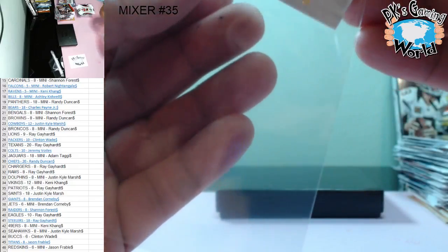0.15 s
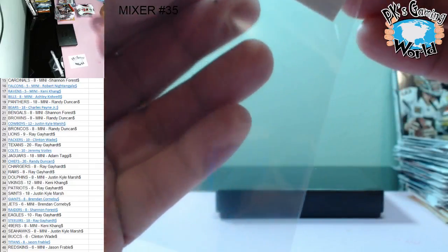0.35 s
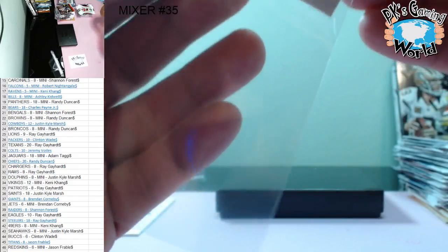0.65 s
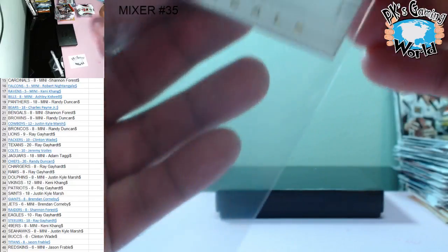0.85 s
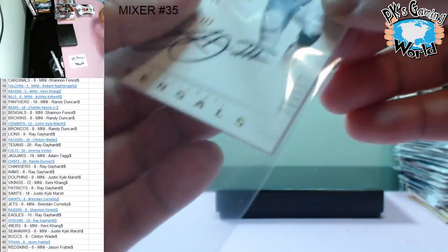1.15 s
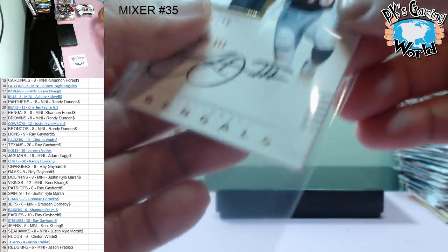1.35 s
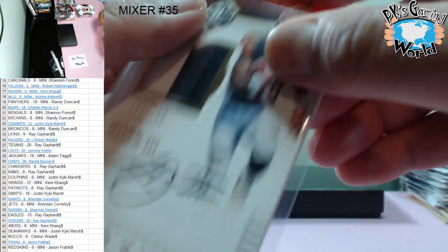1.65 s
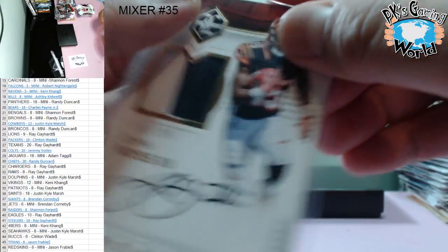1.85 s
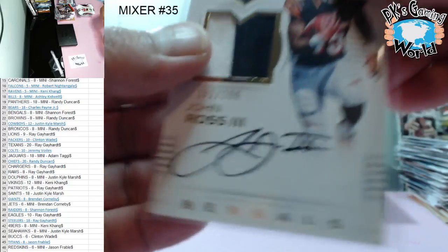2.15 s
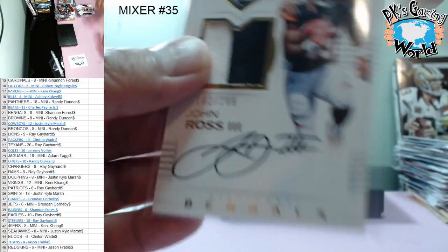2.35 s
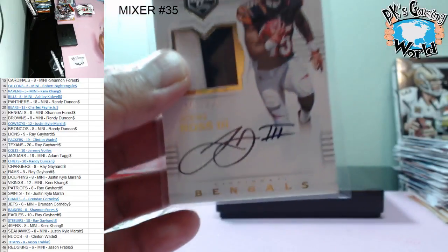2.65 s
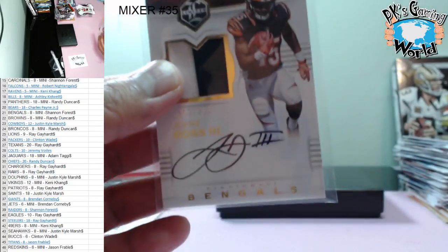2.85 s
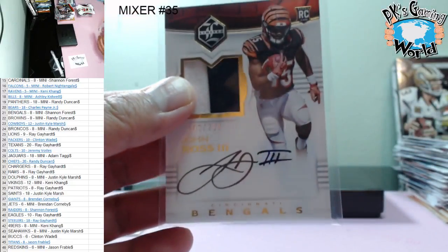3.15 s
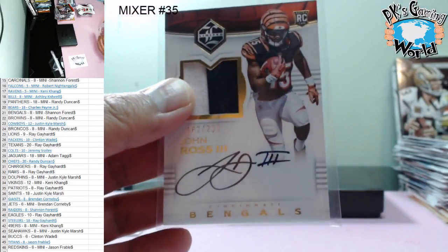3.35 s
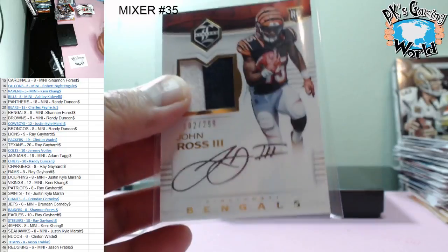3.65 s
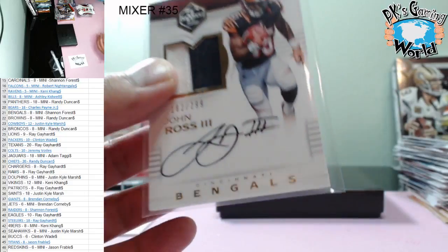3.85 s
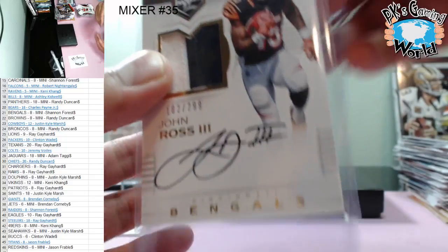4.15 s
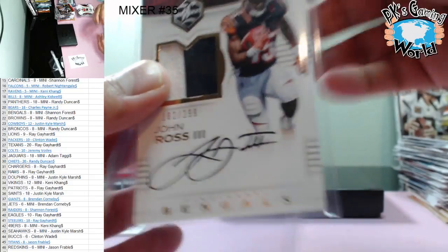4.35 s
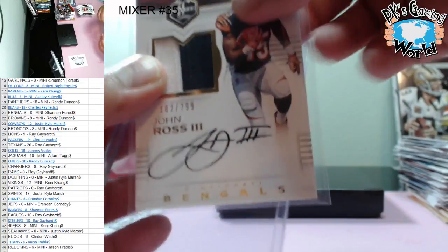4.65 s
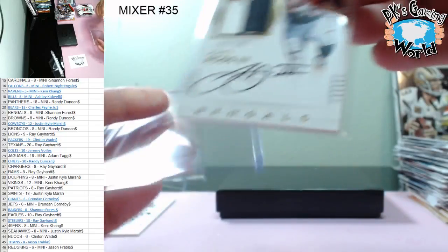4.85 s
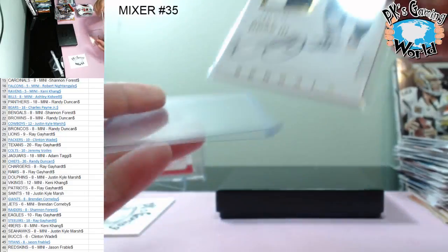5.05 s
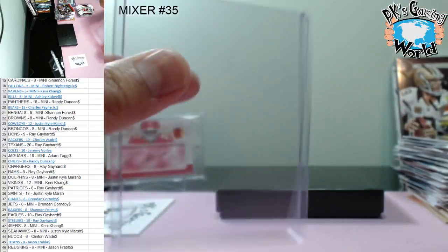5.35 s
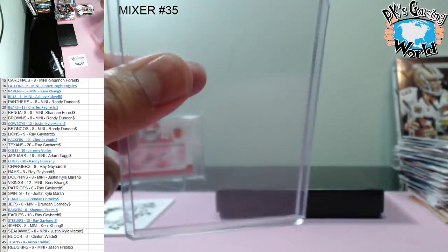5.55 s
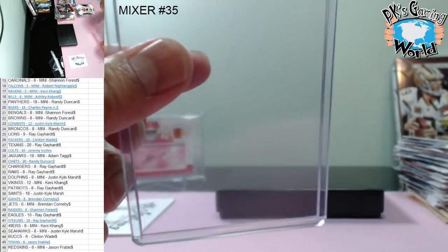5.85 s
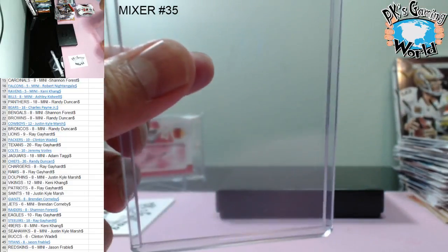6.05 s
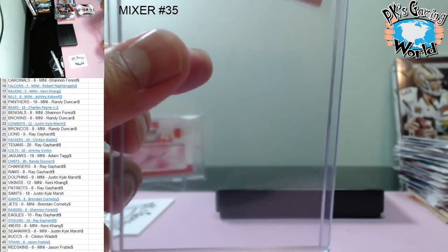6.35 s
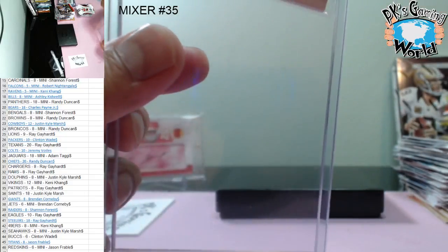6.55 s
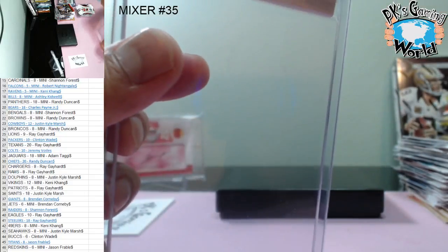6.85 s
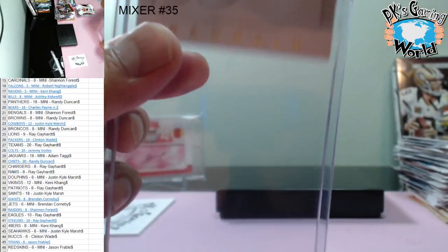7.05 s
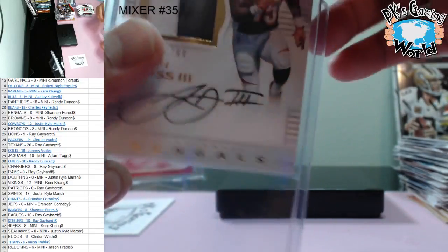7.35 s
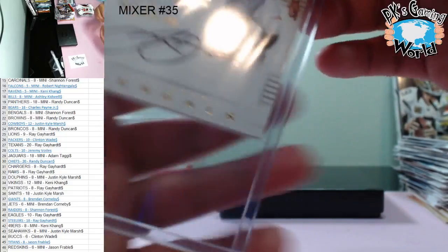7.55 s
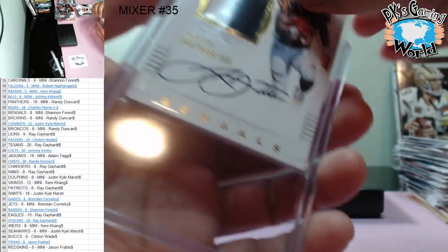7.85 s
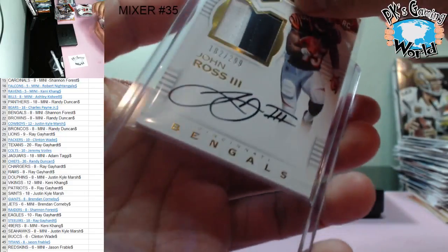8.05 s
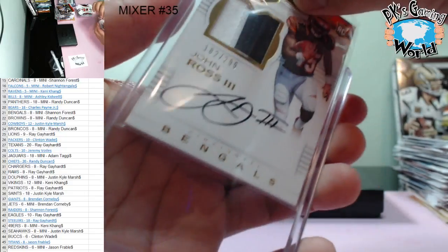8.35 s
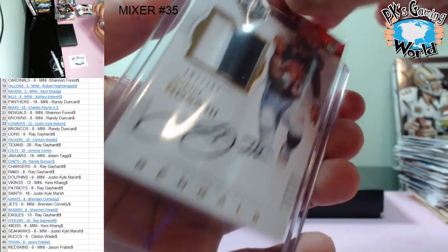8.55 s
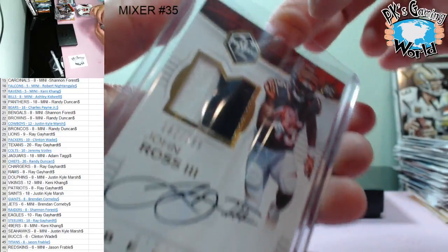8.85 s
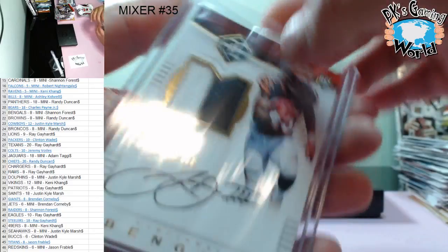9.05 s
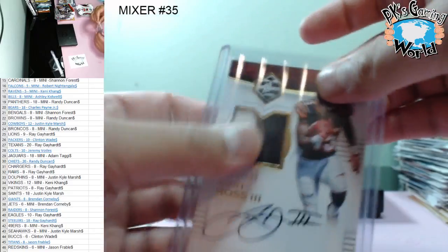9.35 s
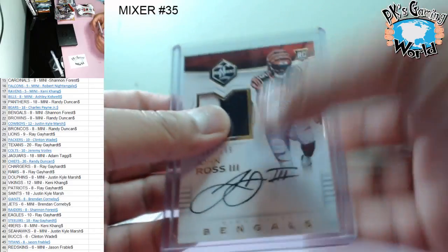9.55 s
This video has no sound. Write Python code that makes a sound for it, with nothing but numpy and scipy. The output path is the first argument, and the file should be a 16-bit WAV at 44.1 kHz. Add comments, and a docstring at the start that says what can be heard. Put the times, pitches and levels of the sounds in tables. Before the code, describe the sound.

A quiet, close recording in a small furnished room, with a steady soft fan murmur, low electrical buzz and faint distant drone throughout. From 0 to 1.5 s, thin plastic slides in faint airy hisses with scattered tiny ticks. Crisp clicks follow at 1.7 and 2.2 s, the latter sharpest. A dull desk thump at 2.7 s leads into a low hollow scrape around 3.1 s, ending in a knock. From 3.6 to 5 s the sleeve rubs, crackles faintly and squeaks briefly, with woodier clicks and a strong tap at 4.9 s. A soft low thud lands near 5.3 s; then it is almost still, the drone slightly clearer, until about 6.2 s. Fuller hissing slides rise at 6.9-7.1 and 7.6 s, with a bright snap at 7.8 s. A busy cluster of crackles and ticks comes at 8.3-8.7 s, then sparse light clicks and faint rubbing to about 9.7 s.

```python
"""Sleeving a trading card

A card is slipped into a soft sleeve, then into a rigid plastic holder, close to a small camera.
Shaped noise makes the plastic slide and hiss; short noise bursts through resonances make edges tick.
Things are knocked and pushed on the desk (ringing modes, hollow grainy noise); the sleeve crackles and squeaks.
Under it lie a low electrical buzz (pulses), a distant drone (a sine) and the murmur of a fan (noise)."""
import sys
import numpy as np
from scipy import signal
from scipy.fft import rfft, irfft
from scipy.io import wavfile

SR = 44100
rng = np.random.default_rng(int(sys.argv[2]) if len(sys.argv) > 2 else 0)


def wav_out(sig):
    """Save sig, one row per channel (or a flat mono array), as 16-bit PCM at SR to the path in sys.argv[1]."""
    wavfile.write(sys.argv[1], SR, np.round(np.clip(np.atleast_2d(sig).T, -1, 1) * 32767).astype(np.int16))


N = 427329


def amp(db):
    """Turns decibels into gain."""
    return 10 ** (np.asarray(db) / 20)


def evened(x):
    """Scales a sound to an average (rms) of 1."""
    return x / np.sqrt(np.mean(x ** 2) + 1e-20)


def read(points, hz):
    """Reads a spectrum between its points, on a log-frequency axis."""
    f, value = np.transpose(points)
    return np.interp(np.log(hz + 1), np.log(f + 1), value)


def curves(rows):
    """Joins the rows of a timed table by straight lines, one curve per column."""
    s, *columns = np.transpose(rows)
    times = np.arange(N) / SR
    return [np.interp(times, s, column) for column in columns]


def add(mix, s, sound):
    """Mixes a sound in at time s, cutting it off at the end."""
    part = mix[round(s * SR):][:len(sound)]
    part += sound[:len(part)]


def drift(rate_hz):
    """Slow random wandering of rms 1: noise with everything much faster than rate_hz removed."""
    hz = np.fft.rfftfreq(N, 1 / SR)
    spectrum = rfft(rng.standard_normal(N)) * np.exp(-(hz / rate_hz) ** 2)
    return evened(irfft(spectrum, N))


def response(points, peaks=(), size=2048):
    """What a struck body answers: a broad spectrum plus resonant peaks, starting at once, with energy 1."""
    hz = abs(np.fft.fftfreq(size, 1 / SR))
    db = read(points, hz)
    for f, width, gain_db in peaks:
        db = db + gain_db / (1 + (2 * (hz - f) / width) ** 2)
    # minimum phase: the sound comes as early as this spectrum allows
    h = np.fft.ifft(np.exp(np.conj(signal.hilbert(np.log(amp(db)))))).real
    return h / np.linalg.norm(h)


def through(x, h):
    """Passes x through an impulse response."""
    return signal.oaconvolve(x, h)[:len(x)]


def grains(per_s, spread_db, smooth):
    """Tiny stick-slip releases of uneven size over smooth friction noise."""
    size = amp(spread_db * np.minimum(rng.exponential(1, N), 4))
    happens = rng.random(N) < per_s / SR
    slips = rng.choice([-1., 1.], N) * size * happens
    return evened(evened(slips) + smooth * rng.standard_normal(N))


def resonate(x, hz, width):
    """A resonance of gain 1 that follows the curve hz: shift down, smooth, shift back up."""
    turn = np.exp(2j * np.pi * np.cumsum(hz) / SR)
    r = np.exp(-np.pi * width / SR)
    return 2 * (turn * signal.lfilter([1 - r], [1, -r], x / turn)).real


def nearby(x, echo_db=-13, latest_s=.005, count=6):
    """Hands and desk throw back a few early reflections that ripple the spectrum."""
    taps = np.zeros(SR // 50)
    at = np.linspace(.15, 1, count) * rng.uniform(.85, 1, count) * latest_s
    fading = np.linspace(1, .5, count)
    taps[(at * SR).astype(int)] = amp(echo_db) * rng.choice([-1., 1.], count) * fading
    taps[0] = 1  # the direct sound
    return through(x, taps / np.linalg.norm(taps))


REST_DB = -79.5  # level of a hand at rest, from which every stroke swells


def stroke(rise_s, hold_s, release_s, db):
    """One hand movement, top 1: it swells evenly in decibels from rest, holds, and dies away."""
    knees = np.cumsum([rise_s, hold_s, release_s])
    t = np.arange(0, knees[-1], 1 / SR)
    depth_db = min(REST_DB - db, 0)
    return amp(np.interp(t, [0, *knees], [depth_db, 0, 0, depth_db]))


# spectrum of the fan's air noise: f/Hz, relative level/dB
FAN_SPECTRUM = [(10, -15), (25, -2), (55, -1), (100, -7.5), (160, -9.5), (250, -14.5), (450, -16.5),
                (760, -20.5), (1200, -26), (2000, -29.5), (4000, -33.5), (8000, -36.5), (12000, -38.5),
                (16000, -40.5)]
# how much the room's low rumble is raised or lowered: t/s, level/dB
RUMBLE_LEVEL = [(6.3, -2.5), (6.7, 2), (7.3, -1), (8.8, 0.5), (9.3, 1.5)]
# steady tones of fan and electronics: f/Hz, level/dB (rms)
STEADY_TONES = [(58.7, -69), (780.2, -77), (958, -83), (8000, -88)]
# a distant low drone that swells for a while: t/s, f/Hz, level/dB (rms)
DISTANT_DRONE = [(0, 126, -65), (1.3, 126, -63.5), (2.2, 128, -64.5), (3.4, 124.4, -64), (4.85, 125.5, -65),
                 (4.98, 122, -56), (5.9, 122.3, -60), (6.28, 121, -56), (6.4, 122.3, -69.5),
                 (9.7, 123, -81)]


def background(floor_db=-59.5, swell_db=0.46, waver_rad=1.0, rumble_hz=400):
    """Fan noise with a slowly changing rumble, faint tones of wavering phase and a low drone."""
    t, hz = np.arange(N) / SR, np.fft.rfftfreq(N, 1 / SR)
    air = evened(through(rng.standard_normal(N), response(FAN_SPECTRUM, size=8192)))
    air = air * amp(floor_db + swell_db * drift(9.1))
    rumble = irfft(rfft(air) * np.exp(-(hz / rumble_hz) ** 2), N)
    air = air + (amp(curves(RUMBLE_LEVEL)[0]) - 1) * rumble
    tones = sum(amp(db) * np.sin(2 * np.pi * f * t + waver_rad * drift(1.5)) for f, db in STEADY_TONES)
    drone_hz, drone_db = curves(DISTANT_DRONE)
    drone_turns = np.cumsum(drone_hz) / SR + rng.random()
    drone = amp(drone_db) * np.sin(2 * np.pi * drone_turns)
    return air + np.sqrt(2) * (tones + drone)  # a sine's peak is root 2 times its rms


# spectrum of one electrical pulse: f/Hz, relative level/dB
PULSE_SPECTRUM = [(5, -30), (30, -8), (60, 0), (150, -3.5), (300, -8), (720, -17), (1200, -31), (3000, -80)]


def buzz(level_db=-60, pulses_hz=30.01, first_s=.0182):
    """The camera's electronics leak one small rounded pulse for every picture."""
    pulses = np.zeros(N)
    times = np.arange(first_s, N / SR, 1 / pulses_hz)
    pulses[(times * SR).astype(int)] = -1
    return amp(level_db) * evened(through(pulses, response(PULSE_SPECTRUM, size=8192)))


# edges catching and tapping: t/s, level/dB, brightness/dB, contact/ms, main ring f/Hz
EDGE_CLICKS = [(0.0662, -47.5, 4, 0.76, 7100), (0.2476, -60, 0, 7.4, 2000), (0.2828, -61, 1, 4.6, 2280),
               (1.015, -57, 4, 4.2, 9750), (1.355, -53, -6, 1.2, 2450), (1.6661, -43.5, 11.5, 0.34, 7800),
               (1.722, -55.5, 8, 2, 8800), (1.8308, -59.5, -1.5, 2.1, 2800), (2.0511, -45, 1, 0.55, 7750),
               (2.232, -38.5, 6, 0.3, 5500), (2.2455, -49, 10, 0.92, 5500), (2.2777, -49, 6, 2.6, 8400),
               (3.6504, -40.5, 1, 4.3, 5600), (3.716, -55, -16, 3.8, 2600), (3.77, -53.5, -6, 4.6, 3250),
               (4.2627, -54.5, -8.5, 2.9, 2830), (4.3505, -50, -8.5, 5.2, 3500),
               (4.5284, -56.5, -7, 8.7, 2270), (4.6851, -47.5, -1, 1.9, 2300),
               (4.7077, -43.5, -10.5, 4, 2280), (4.8276, -57, -4, 2.8, 3700), (4.8418, -56, -19, 2.2, 2750),
               (4.9055, -38, -3.5, 2.3, 3500), (5.2893, -47, -17, 4.7, 2620),
               (5.4395, -50.5, -7, 3.1, 2350), (5.977, -64, 0, 2.5, 2700), (6.158, -55, -2, 0.77, 2850),
               (7.0511, -46.5, -1, 1.5, 3700), (7.6426, -59.5, 15, 2, 8600), (7.708, -53, 24, 1.6, 7800),
               (7.8131, -40, 14, 3.1, 8040), (8.3235, -48.5, 2.5, 2.3, 6600), (8.355, -44.5, 16, 1.3, 6560),
               (8.373, -46.5, -6, 2, 2280), (8.4216, -47.5, 4, 2.5, 2170), (8.457, -42.5, 6.5, 1.1, 8350),
               (8.5517, -49, -2.5, 1.4, 2260), (8.593, -51.5, -4, 1.6, 2000), (8.6704, -56, -2.5, 5, 2160),
               (8.8826, -50, -2.5, 3, 2060), (9.0423, -50, 1, 3.8, 7600), (9.159, -60, -2, 3.2, 2820),
               (9.236, -60, -7, 3, 2470), (9.355, -51, 2.5, 2.7, 5800), (9.599, -49.5, 6, 4.4, 5330)]
# resonances of card and holder: f/Hz, width/Hz, level/dB
PLASTIC_PEAKS = [(2290, 350, 4), (2705, 180, 2.5), (3480, 110, 2.5), (4030, 200, 1.5), (5380, 500, -3),
                 (6860, 830, 3.5), (8000, 490, 2.5), (9440, 600, 2)]
# spectrum of the dull, hollow part of a blow: f/Hz, relative level/dB
BODY_SPECTRUM = [(100, -28), (300, -2), (750, 2.5), (1300, -4), (1700, -16.5), (3000, -50)]
# spectrum of bending plastic: f/Hz, relative level/dB
FLEX_SPECTRUM = [(700, -33), (1400, -9), (1900, -1.5), (3000, 6), (4400, 0), (5500, -1.5), (8000, -43)]
# spectrum of the bright part of a snap: f/Hz, relative level/dB
SNAP_SPECTRUM = [(2500, -40), (3700, -10.5), (5400, 5), (8000, 4.5), (10300, 3.5), (12000, -5),
                 (16000, -30)]
# the main bending resonance shifts and sharpens with the grip: t/s, f/Hz, strength level/dB
GRIP_CURVE = [(0, 2380, -4), (1.4, 2450, -8), (3.8, 2570, -24), (4.1, 2310, -5), (4.8, 2400, -1),
              (6.2, 2580, 0), (7.3, 2650, -3), (7.8, 2350, 0), (8.3, 2060, -1), (8.7, 2150, 4),
              (9.3, 2300, -8)]


def clicks(body_at_1ms_db=-22, body_db_per_doubling=6.0, first_snap=4.7, chatter_db=-21, chatter_s=0.0028,
           ring_db=9, ring_width_share=0.18, loose_hz=2500, rise_share=0.28, soften=0.23, body_per_bright=0.28):
    """An edge snaps free and chatters briefly, ringing one resonance most; longer contact sounds more hollow."""
    out, t = np.zeros(N), np.arange(4096) / SR
    body, grip_hz = response(BODY_SPECTRUM), curves(GRIP_CURVE)[0]
    window = SR // 100  # loudness is set over the first 10 ms
    for s, db, bright_db, contact_ms, ring_hz in EDGE_CLICKS:
        peaks = [*PLASTIC_PEAKS, (ring_hz, ring_width_share * ring_hz, ring_db)]
        # the whole bending range moves with the grip
        bending = np.array(FLEX_SPECTRUM) * [grip_hz[round(s * SR)] / loose_hz, 1]
        flex, snap = response(bending, peaks), response(SNAP_SPECTRUM, peaks)
        contact = np.exp(-t * 1000 / (np.sqrt(2) * contact_ms))
        chatter = amp(chatter_db) * np.exp(-t / chatter_s)
        force = rng.standard_normal(len(t)) * (contact + chatter)
        force *= 1 - np.exp(-t * 1000 / (rise_share * contact_ms))
        force[0] = first_snap / contact_ms ** soften  # a long contact starts softly
        parts = [through(force, h) for h in (body, flex, snap)]
        low, mid, high = (y / np.sqrt(np.mean(y[:window] ** 2)) for y in parts)
        tick = (mid + amp(bright_db) * high) / np.hypot(1, amp(bright_db))
        body_db = body_at_1ms_db + body_db_per_doubling * np.log2(contact_ms) - body_per_bright * bright_db
        add(out, s, amp(db) * (tick + amp(body_db) * low))
    return out


# plastic sliding on plastic: t/s, rise/s, hold/s, release/s, level/dB, brightness/dB
SLIDING_STROKES = [(0.33, 0.048, .01, 0.058, -64.5, 2), (0.559, 0.078, 0.044, 0.22, -66, 2.5),
                   (0.761, 0.028, 0.0042, 0.072, -62.5, 8), (0.926, 0.086, 0.025, 0.19, -57, 8.5),
                   (1.333, .03, 0.3, .13, -64, 8.5), (1.463, 0.096, .005, 0.073, -62, 13),
                   (2.211, 0.018, 0.057, 0.016, -60, 4), (3.605, 0.041, 0.17, 0.31, -60.5, -5),
                   (4.063, 0.028, 0.025, .04, -59, -3), (4.254, 0.043, 0.028, 0.17, -57.5, 0),
                   (4.47, 0.033, .01, .025, -56, 25), (4.516, .025, 0.017, 0.099, -64.5, 0),
                   (4.67, 0.012, .02, 0.071, -57, -4), (4.73, .04, .12, .03, -70.5, 0),
                   (4.894, .012, 0.024, 0.064, -57, -15), (4.975, 0.1, 0.1, .09, -66.5, -2.5),
                   (5.23, 0.05, 0.0089, 0.04, -53, -1), (6.179, 0.076, .01, 0.16, -58.5, 0.5),
                   (6.894, 0.11, 0.1, 0.21, -56, 5.5), (7.05, 0.097, 0.094, 0.1, -52, 10),
                   (7.527, 0.079, 0.044, .04, -71, 1), (7.615, .17, .03, 0.046, -53, 8),
                   (7.914, 0.053, 0.18, 0.085, -71.5, 2), (8.3, 0.064, 0.063, 0.058, -58, -1.5),
                   (8.431, .025, 0.19, 0.091, -59.5, 0), (8.971, 0.072, .005, 0.028, -57.5, -2),
                   (9.132, 0.026, 0.21, .05, -68.5, -2), (9.468, 0.067, 0.17, .05, -63, 0.5)]
# spectrum of the sliding hiss: f/Hz, relative level/dB
HISS_SPECTRUM = [(2500, -53), (4300, -6.5), (5400, 1.5), (8000, -0.5), (10500, 0.5), (12000, -6),
                 (13500, -14), (16000, -24)]


def sliding(flex_unsteady_db=2.5, hiss_unsteady_db=1.9, grip_db=4, stage_width_hz=400,
            hiss_power=1.1, tilt_per_bright=0.62, plain_bright_db=4, pivot_hz=9800, loose_hz=2350):
    """Friction rings the plastic's bending resonances; a bright stroke hisses more and higher."""
    grip_hz, strength_db = curves(GRIP_CURVE)
    friction, pressure = grains(per_s=1200, spread_db=2.8, smooth=0.98), drift(43)
    glide = grains(per_s=3500, spread_db=2.5, smooth=0.92)
    drag = evened(friction * amp(flex_unsteady_db * pressure))
    skim = evened(glide * amp(hiss_unsteady_db * pressure))
    # two stages make the bending resonance narrower and steeper
    ring = resonate(drag, grip_hz, stage_width_hz)
    ring = evened(resonate(ring, grip_hz, stage_width_hz))
    out = np.zeros(N)
    for s, rise_s, hold_s, release_s, db, bright_db in SLIDING_STROKES:
        start = round(s * SR)
        speed = stroke(rise_s, hold_s, release_s, db)[:N - start]
        span = slice(start, start + len(speed))
        # the whole bending range moves with the grip
        bending = np.array(FLEX_SPECTRUM) * [grip_hz[span].mean() / loose_hz, 1]
        share = amp(strength_db[span] - grip_db)
        flex = through(drag[span], response(bending, PLASTIC_PEAKS))
        flex = (flex + share * ring[span]) / np.hypot(1, share)
        tilt_db = tilt_per_bright * (bright_db - plain_bright_db)  # per octave, below the pivot
        colour = [(hz, g + tilt_db * min(np.log2(hz / pivot_hz), 0)) for hz, g in HISS_SPECTRUM]
        hiss = amp(bright_db) * through(skim[span], response(colour, PLASTIC_PEAKS))
        rub = (flex * speed + hiss * speed ** hiss_power) / np.hypot(1, amp(bright_db))
        add(out, s, amp(db) * nearby(rub, echo_db=-14))  # the hands lie differently for every stroke
    return out


# knocks on the desk: t/s, level/dB, centre of the blow f/Hz, contact/ms
DESK_KNOCKS = [(2.2317, -56.5, 1040, 1), (2.704, -46.5, 197, 7.9), (3.214, -51.5, 690, 1.6),
               (3.6505, -49, 1230, 3.2), (4.7074, -66, 1100, 3), (4.907, -64, 600, 3.5),
               (5.282, -44, 176, 13)]
# what the desk rings with: f/Hz, relative level/dB, time to fade by 60 dB/s
DESK_MODES = [(119.6, 6.5, 0.22), (171, -7, 0.2), (259.4, 3.5, 0.097), (546, -17, 0.14), (731, 7, 0.076),
              (815, 3, 0.1), (1114, -5.5, 0.11), (1270, 7, 0.1), (1332, -3.5, 0.17), (1850, -1.5, .09)]


def knocks(reach_octaves=0.56, thud_db=-9):
    """Each blow rings the desk modes near its own pitch, with a short dull thud."""
    out, t = np.zeros(N), np.arange(SR // 3) / SR
    window = SR // 40  # loudness is set over the first 25 ms
    for s, db, centre_hz, contact_ms in DESK_KNOCKS:
        ring = np.zeros(len(t))
        for hz, mode_db, t60 in DESK_MODES:
            nearness = 1 / (1 + (np.log2(hz / centre_hz) / reach_octaves) ** 2)
            wave = np.sin(2 * np.pi * (hz * t + rng.random()))
            ring += amp(mode_db - 60 * t / t60) * nearness * wave
        contact = np.exp(-t * 1000 / contact_ms)
        ring = ring * (1 - contact ** 4)  # the ring builds up during the contact
        thud = through(rng.standard_normal(len(t)) * np.sqrt(contact), response(BODY_SPECTRUM))
        blow = evened(ring) + amp(thud_db) * evened(thud)
        add(out, s, amp(db) * blow / np.sqrt(np.mean(blow[:window] ** 2)))
    return out


# something shifted and pushed over the desk: t/s, rise/s, hold/s, release/s, level/dB
DESK_PUSHES = [(2.68, 0.027, .005, 0.093, -55.5), (2.754, 0.16, 0.13, 0.087, -71),
               (3.136, .14, 0.13, 0.039, -55)]
# spectrum of the scrape: f/Hz, relative level/dB
SCRAPE_SPECTRUM = [(200, -23), (560, -3), (760, -1.5), (1050, -12), (4200, -12.5), (5400, -19), (8000, -20),
                   (15000, -32)]
# resonances of the pushed thing: f/Hz, width/Hz, level/dB
HOLLOW_PEAKS = [(727, 99, 6.5), (870, 83, 7.5), (1330, 110, 7), (1860, 160, 4), (2320, 380, 8),
                (2660, 120, 3), (3050, 140, 7.5), (3700, 120, 5), (4900, 250, 8.5), (5900, 180, 8),
                (6900, 220, 8)]


def push():
    """A scrape over the desk: fine friction grains ring the hollow resonances of the pushed thing."""
    level = np.zeros(N)
    for s, rise_s, hold_s, release_s, db in DESK_PUSHES:
        add(level, s, amp(db) * stroke(rise_s, hold_s, release_s, db))
    drive = grains(per_s=1700, spread_db=2.0, smooth=0.91)
    return level * evened(through(drive, response(SCRAPE_SPECTRUM, HOLLOW_PEAKS)))


# the sleeve catching as it is pushed: t/s, length/s, level/dB (sets the largest snap)
SLEEVE_CRACKLES = [(3.69, .14, -63), (7.72, 0.097, -61), (8.33, .085, -53.5), (8.47, .21, -61.5)]


def crackle(gap_s=.013, weakest=0.16):
    """The sleeve catches and lets go in a quick run of uneven snaps, about gap_s apart."""
    snaps = np.zeros(N)
    for s, length_s, db in SLEEVE_CRACKLES:
        count = round(length_s / gap_s)
        place, size, sign = rng.random((count, 3)).T
        at = s + length_s * (np.arange(count) + place) / count
        strength = weakest + (1 - weakest) * size
        snaps[(at * SR).astype(int)] = amp(db) * np.sign(sign - .5) * strength
    colour = response(FLEX_SPECTRUM, PLASTIC_PEAKS) + response(SNAP_SPECTRUM, PLASTIC_PEAKS)
    return np.sqrt(SR / 100) * through(snaps, colour)  # spreads each snap's level over 10 ms


# the pinched holder sings briefly as it slips: t/s, length/s, f/Hz, level/dB
HOLDER_SQUEAKS = [(4.08, 0.058, 2280, -56.5), (4.284, 0.038, 2220, -55.5), (4.528, .09, 2200, -67.5),
                  (4.675, 0.034, 2280, -58)]


def squeaks(stage_width_hz=230):
    """Uneven slips feed one narrow bending resonance, filtered twice."""
    out = np.zeros(N)
    for s, length_s, hz, db in HOLDER_SQUEAKS:
        count = round(length_s * SR)
        b, a = signal.iirpeak(hz, hz / stage_width_hz, fs=SR)
        slips = rng.standard_normal(count) ** 3  # cubing makes a few slips stand out
        ring = signal.lfilter(b, a, signal.lfilter(b, a, slips))
        add(out, s, amp(db) * evened(ring * signal.windows.tukey(count, .5)))
    return out


def room(x, wet_db=-15, t60=0.12, dull_hz=6000):
    """A small furnished room: a short, faint tail of scattered reflections."""
    t = np.arange(SR // 3) / SR
    scattered = (rng.random(len(t)) < .1) * (t > .003)
    taps = rng.standard_normal(len(t)) * scattered * amp(-60 * t / t60)
    tail = signal.lfilter(*signal.butter(1, dull_hz, fs=SR), taps)
    return x + amp(wet_db) * through(x, tail / np.linalg.norm(tail))


def scene():
    """Handling sounds in the room, over the steady background."""
    handling = clicks() + sliding() + knocks() + push() + crackle() + squeaks()
    return (background() + buzz() + room(handling))[None]


def record(dry, offset=.0062, edge_hz=15850):
    """The recorder sits slightly off zero (share of full scale) and then cuts what lies above edge_hz."""
    low_pass = signal.firwin(511, edge_hz, window=("kaiser", 9), fs=SR)
    return signal.oaconvolve(dry + offset, low_pass[None], "same")


dry = scene()
out = record(dry)
wav_out(out)
```